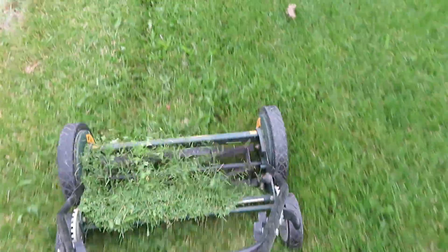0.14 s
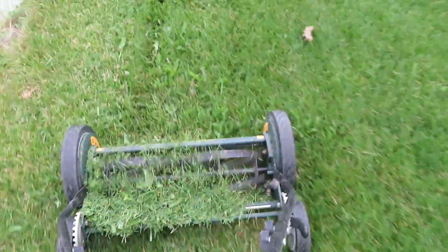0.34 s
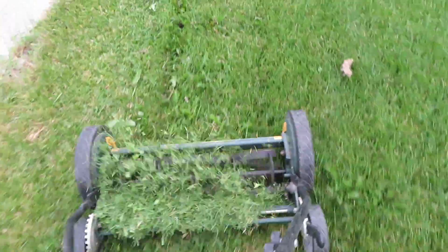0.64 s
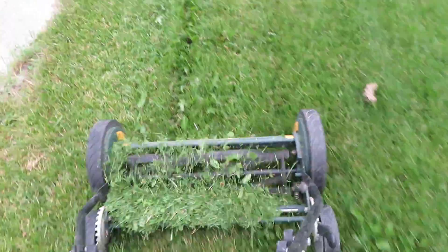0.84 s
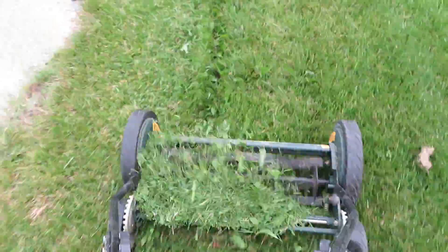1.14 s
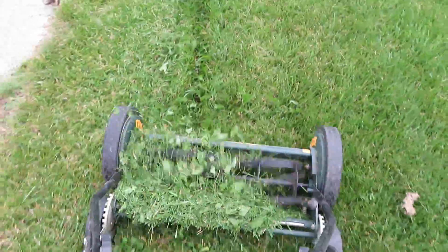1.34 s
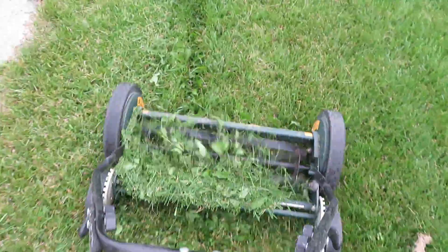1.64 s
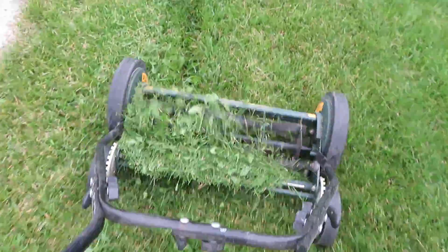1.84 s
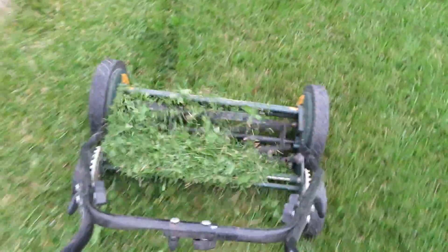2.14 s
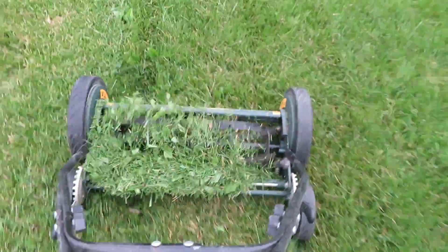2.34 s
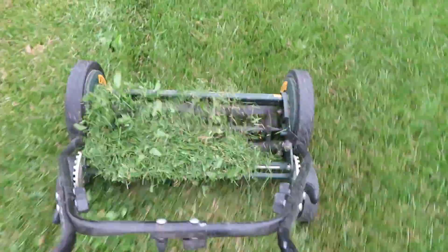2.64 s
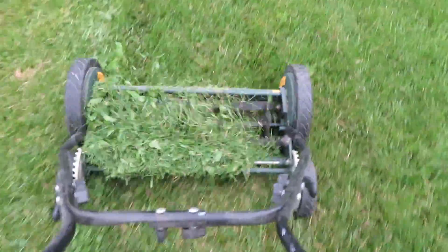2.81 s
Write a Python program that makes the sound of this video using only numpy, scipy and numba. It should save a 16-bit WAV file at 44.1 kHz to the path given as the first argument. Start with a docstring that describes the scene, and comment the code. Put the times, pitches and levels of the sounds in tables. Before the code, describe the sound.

A manual reel mower is pushed across a lawn, heard close from the handle. Its steel blades scrape in a fast, ringing whir with a crisp hiss of cut grass and soft wheel rumble, turning slower and uneven later.

```python
"""Reel mower on a lawn

A hand mower is pushed along, heard from the handle. About 17 times a second, later slower and unevenly,
a spiral blade scrapes along the bed knife. As the contact travels, friction excites the steel's
resonances in turn and one sweeps up and back. The frame rings on, grass is snipped with a crisp hiss
and the wheels rumble softly."""
import sys
import numpy as np
from scipy import signal
from scipy.fft import rfft, irfft, next_fast_len
from scipy.io import wavfile
from scipy.ndimage import uniform_filter1d
from numba import njit

SR = 44100
rng = np.random.default_rng(int(sys.argv[2]) if len(sys.argv) > 2 else 0)


def dump_mix(stems):
    """Bounce the given channels to the path in sys.argv[1] as a 16-bit WAV at rate SR."""
    frames = np.atleast_2d(stems).T  # one column per channel
    limited = np.clip(frames, -1, 1)  # hard clip at full scale
    pcm = np.round(limited * 32767).astype(np.int16)
    wavfile.write(sys.argv[1], SR, pcm)


N = 130977

# Speed of the reel. Each row: time in seconds, blade passes per second.
PASS_RATE = [(0.0, 17.7), (0.15, 17.11), (0.62, 18.69), (1.0, 17.42), (1.42, 17.32), (1.55, 11.49),
             (1.75, 16.71), (2.0, 18.26), (2.15, 14.4), (2.35, 13.47), (2.6, 17.0), (2.7, 10.52),
             (2.85, 15.1), (2.97, 13.86)]
# Broad resonances of knife and frame. Each row: frequency in Hz, bandwidth in Hz, relative level in dB,
# place in the pass from 0 to 1, gain at that place in dB.
KNIFE_MODES = [(241, 91, -24.5, 0.18, 7), (540, 37.7, -11, 0.94, 11.5), (577.2, 27, -11, 0.86, 3.5),
               (703, 98, -12, 0, 8.5), (846.7, 77, -3, 0.16, 3), (931, 88, -4.5, 0.6, 2.5),
               (1026, 57, -13.5, 0.31, 5.5), (1579, 63, -14.5, 0.72, 3.5), (1861, 63, -14.5, 0.66, 2.5),
               (1986, 48, -16.5, 0.41, -4), (2529, 102, -13, 0.26, -0.5), (2568, 153, -13.5, 0.44, -1),
               (2672, 76, -12, 0.91, 8)]
# Pressure of blade on knife, heard in the low modes. Each row: time in seconds, relative level in dB.
CONTACT_LEVEL = [(0, -17), (.09, -16.5), (.17, -18.7), (.36, -16.7), (.58, -18), (.72, -17), (1.0, -17),
                 (1.2, -17.8), (1.45, -18), (1.82, -15.3), (2.04, -19), (2.27, -17.5), (2.38, -18.3),
                 (2.55, -17), (2.8, -17.8), (2.97, -18)]
# Strength of the high steel modes. Each row: time in seconds, relative level in dB.
HIGH_MODE_LEVEL = [(0, -24.5), (.38, -21.5), (.55, -22), (1.0, -21), (1.3, -22.5), (1.55, -22),
                   (1.66, -20.5), (1.95, -20.5), (2.05, -22), (2.35, -22), (2.5, -18.5), (2.78, -19),
                   (2.88, -23.5), (2.97, -21)]
# Long-ringing modes of reel and frame. Each row: frequency in Hz, bandwidth in Hz, relative level in dB.
FRAME_MODES = [(212, 10, -35), (817, 14, -33), (1632, 12, -34), (1829, 16, -38), (2072, 9, -41),
               (2165, 20, -46), (2265, 25, -43), (2733, 10, -35), (3657, 10, -42)]
# Strength of that ringing. Each row: time in seconds, gain in dB.
RING_LEVEL = [(0, 8.5), (.2, 1), (.36, 3), (.7, -1), (1.3, 0.5), (1.65, 0), (1.82, 1), (2.2, -1), (2.38, 3),
              (2.55, -2.5), (2.97, -5.5)]
# Amount of grass the blades meet. Each row: time in seconds, relative level in dB.
GRASS_LEVEL = [(0, -25.5), (.2, -28.3), (.36, -25), (.45, -28), (.62, -25.5), (1.15, -26), (1.38, -24),
               (1.55, -28.5), (1.68, -24), (1.86, -24), (1.91, -26.5), (1.97, -24), (2.06, -27),
               (2.18, -27), (2.36, -25), (2.78, -24), (2.87, -27.5), (2.97, -26)]
# Spectrum of the cutting hiss. Each row: frequency in Hz, relative spectral density in dB.
HISS_SPECTRUM = [(300, -36), (700, -12), (1300, -1.5), (1750, 2.5), (2200, -14), (3000, 4.5), (3500, 1.5),
                 (4400, 2), (4850, -2), (5300, 2), (5800, -5.5), (6850, -3.5), (7280, -1), (7600, -4.5),
                 (8700, -6), (9250, -14.5), (9900, -4.5), (11000, -7.5), (12500, -5.5), (13300, -14),
                 (14200, -9), (15700, -19)]
# Spectrum of wheels on turf. Each row: frequency in Hz, relative spectral density in dB.
WHEEL_SPECTRUM = [(20, -12), (42, -5), (56, 5.5), (75, -1.5), (102, 9), (170, 0), (260, 6.5), (400, 2),
                  (700, -3), (2000, -45)]
# Scattered sound that sets left apart from right. Each row: frequency in Hz, level against the middle in dB.
SIDE_SPECTRUM = [(30, -28), (110, -20), (200, -25), (380, -11.5), (560, -42), (800, -65.5), (1300, -72),
                 (2500, -29), (4000, -14.5), (8000, -9.5), (12000, -13.5)]


def undb(db):
    """Amplitude grows tenfold for every 20 dB."""
    return 10 ** (np.asarray(db) / 20)


def unit(x):
    """Normalisation brings the rms amplitude to 1."""
    return x / np.sqrt(np.mean(x ** 2))


def curve(rows):
    """Linear interpolation joins rows of time in seconds and value."""
    return np.interp(np.arange(N) / SR, *np.array(rows, float).T)


def colour(x, spectrum):
    """Filtering multiplies the spectrum by a gain curve, given as rows of Hz and dB."""
    hz, db = np.array(spectrum, float).T
    size = next_fast_len(N + N // 10)
    bin_hz = np.maximum(np.fft.rfftfreq(size, 1 / SR), 1)
    gain = undb(np.interp(np.log(bin_hz), np.log(hz), db))
    return irfft(rfft(x, size) * gain, size)[:N]


@njit
def bandpass(x, hz, width_hz):
    """A damped oscillator responds most near its natural frequency, which may move every sample."""
    out = np.empty(len(x))
    band, low = 0., 0.
    for i in range(len(x)):
        step = np.tan(np.pi * hz[i] / SR)
        damping = width_hz / hz[i]
        velocity = (band + step * (x[i] - low)) / (1 + step * (step + damping))
        band = 2 * velocity - band
        low += 2 * step * velocity
        out[i] = damping * velocity
    return out


def resonate(x, hz, width_hz, skirt):
    """Filters in cascade: a second band, skirt times as wide, trims a resonance's flanks. The rms is 1."""
    centre = hz * np.ones(N)
    ring = bandpass(x, centre, float(width_hz))
    return unit(bandpass(ring, centre, float(skirt * width_hz)))


def grains(per_s, spread_db, smooth):
    """Shot noise: independent clicks of uneven size lie over a share of smooth noise."""
    clicks = (rng.random(N) < per_s / SR) * rng.choice([-1, 1], N)
    sizes = undb(spread_db * np.minimum(rng.exponential(size=N), 5))
    return unit(unit(clicks * sizes) + smooth * rng.standard_normal(N))


def per_pass(passes):
    """Random modulation: one Gaussian value for each pass glides into the next."""
    values = rng.standard_normal(size=128)
    return np.interp(passes, np.arange(len(values)) + .5, values)


def swell(passes, place, swing_db):
    """Periodic modulation: the gain is swing_db at one place in each pass, the opposite half a pass on."""
    return undb(swing_db * np.cos(2 * np.pi * (passes - place)))


def scrape():
    """Sliding friction of steel on steel is a dense train of tiny impulses."""
    return grains(per_s=900, spread_db=2, smooth=0.85)


def handover(passes, place=.03, half_width=.15, depth_db=-4):
    """Amplitude modulation: the ringing dips briefly as one blade leaves the knife and the next meets it."""
    away = (passes - place + .5) % 1 - .5
    return undb(depth_db * np.exp(-(away / half_width) ** 2))


def settle(x, window_s=.085, share=.95):
    """Friction feeds weak vibration and damps strong, so passes come out about equally loud."""
    size = int(window_s * SR)
    power = uniform_filter1d(uniform_filter1d(unit(x) ** 2, size), size // 2)
    return x / power ** (share / 2)


def blades(passes, detune=0.0084, handover_from_hz=700, high_from_hz=1300):
    """A travelling contact excites each mode in turn and sweeps one resonance up and back."""
    friction = scrape() * undb(.4 * per_pass(passes))
    low, high = np.zeros(N), np.zeros(N)
    for hz, width_hz, db, place, swing_db in KNIFE_MODES:
        drive = friction * swell(passes, place, swing_db) * undb(.8 * per_pass(passes))
        mode_hz = hz * (1 + detune * per_pass(passes))  # each blade rings slightly differently
        ring = undb(db) * resonate(drive, mode_hz, width_hz, skirt=3.55)
        if hz > handover_from_hz:
            ring *= handover(passes)
        if hz > high_from_hz:
            high += ring
        else:
            low += ring
    sweep_hz = np.interp(passes % 1, [0, 0.446, 1], [561, 1070, 561])
    sweep = undb(-10.5) * resonate(scrape(), sweep_hz, width_hz=46, skirt=5.7)
    clatter = settle(low + sweep) * undb(curve(CONTACT_LEVEL) - 0.6)
    steel = settle(high) * undb(curve(HIGH_MODE_LEVEL) + 5)
    return clatter + steel


def frame(passes):
    """Lightly damped modes of the reel and frame keep ringing from one pass to the next."""
    push = swell(passes, place=0.53, swing_db=-1)
    rings = sum(undb(db) * resonate(rng.standard_normal(N) * push, hz, width_hz, skirt=17)
                for hz, width_hz, db in FRAME_MODES)
    return rings * undb(curve(RING_LEVEL))


def edge_pings(per_s=2200, t60_s=0.069, low_hz=1211, high_hz=14890, spread_db=3):
    """Free vibration: the cutting edges catch and ring at random high pitches, decaying exponentially."""
    age = np.arange(int(.7 * t60_s * SR)) / SR
    fade = undb(-60 * age / t60_s)
    out = np.zeros(N + len(age))
    for when, pitch, weakness in rng.random((int(per_s * N / SR), 3)):
        start = int(when * N)
        hz = low_hz + pitch ** 1.3 * (high_hz - low_hz)
        gain = undb(-spread_db * np.log(weakness + 0.03))
        out[start:start + len(age)] += gain * fade * np.sin(2 * np.pi * hz * age)
    return unit(out[:N])


def grass(passes):
    """Snapping stalks and chiming edges superpose into a hiss, loudest near the middle of each pass."""
    snips = grains(per_s=2800, spread_db=5, smooth=2.1)
    cut = snips + undb(-1.5) * edge_pings()
    scatter_db = 0.54 * per_pass(2 * passes)
    gain = undb(curve(GRASS_LEVEL) + 1.5 + scatter_db) * swell(passes, place=0.58, swing_db=1.33)
    return gain * unit(colour(cut, HISS_SPECTRUM))


def wheels():
    """Rolling contact with turf makes a soft, low-frequency noise."""
    return undb(-40.5) * unit(colour(rng.standard_normal(N), WHEEL_SPECTRUM))


def mower(passes):
    """By superposition, the sound pressures of the four sources add."""
    return blades(passes) + frame(passes) + grass(passes) + wheels()


def scene():
    """The reel sets the rhythm; incoherent scattered sound parts left from right, most in the treble."""
    passes = 0.03 + np.cumsum(curve(PASS_RATE)) / SR  # running count of blade passes
    middle = mower(passes)
    side = colour(mower(passes), SIDE_SPECTRUM)
    return np.array([middle + side, middle - side])


def record(dry, cutoff_hz=15700):
    """A steep low-pass filter removes the highest treble."""
    return signal.sosfilt(signal.ellip(10, .2, 80, cutoff_hz, fs=SR, output="sos"), dry)


dry = scene()
out = record(dry)
dump_mix(out)
```